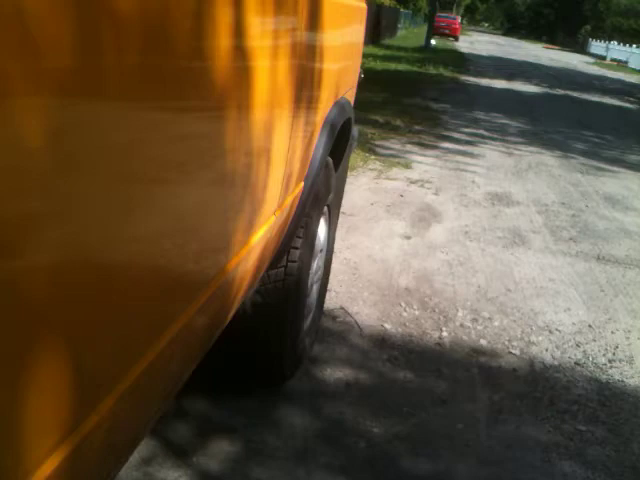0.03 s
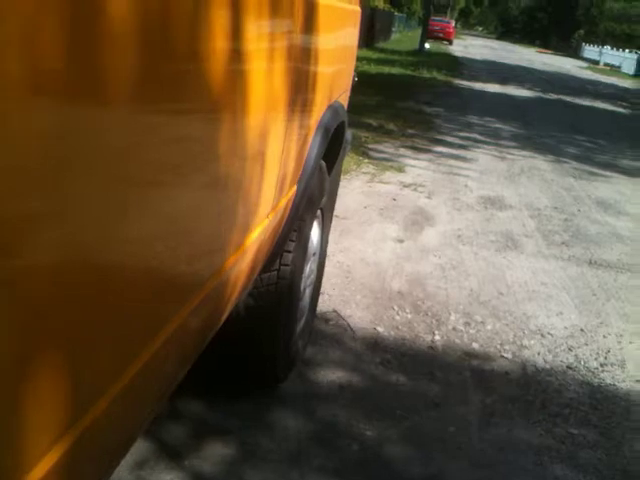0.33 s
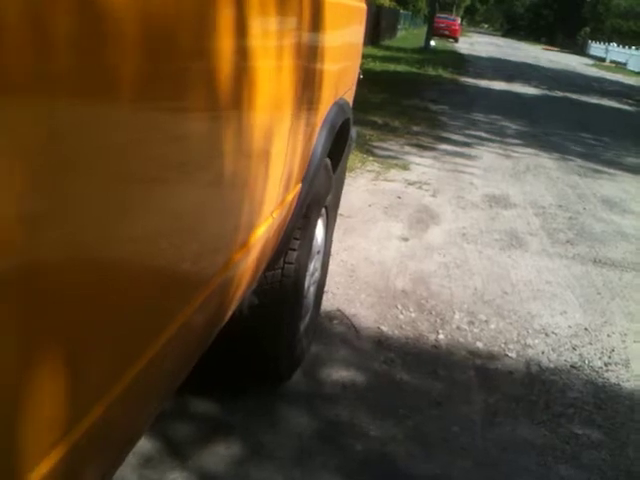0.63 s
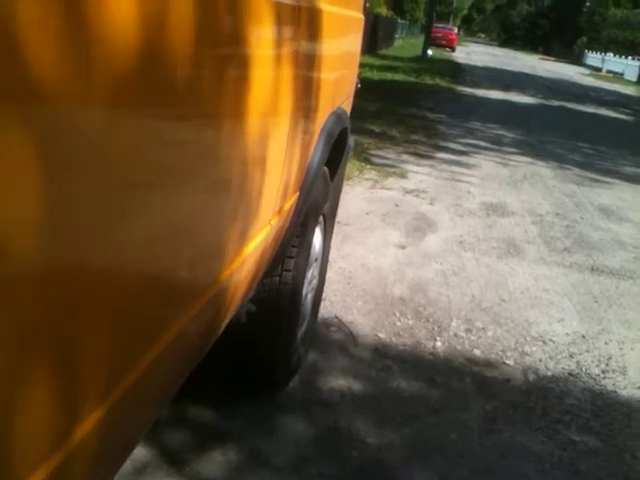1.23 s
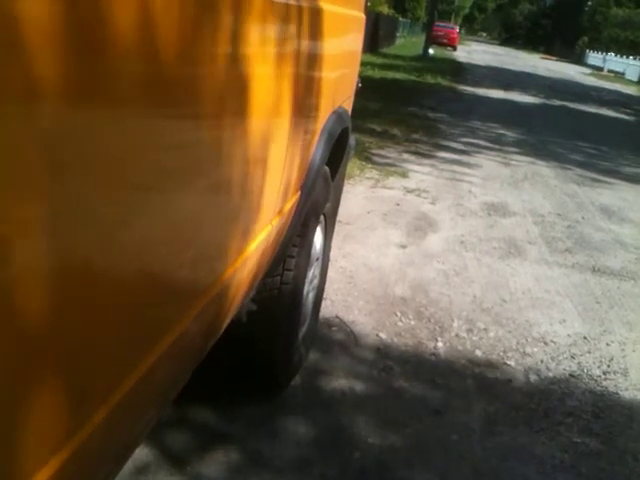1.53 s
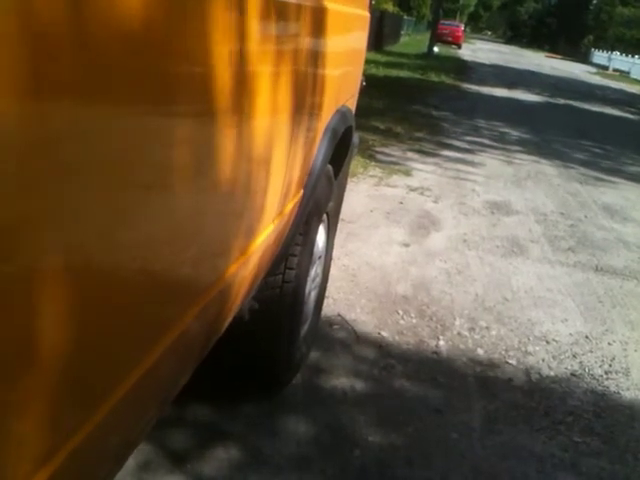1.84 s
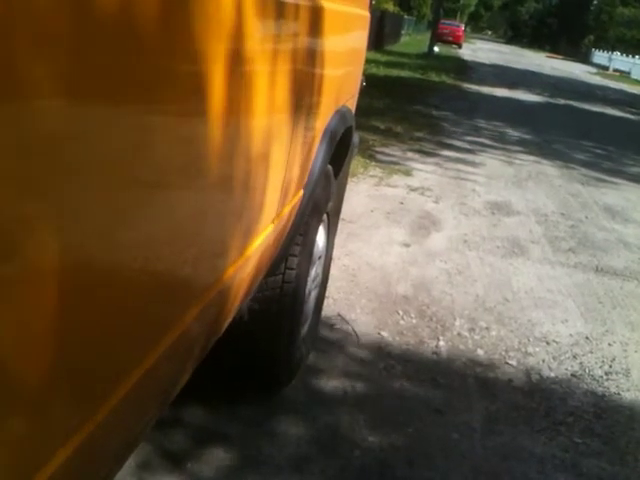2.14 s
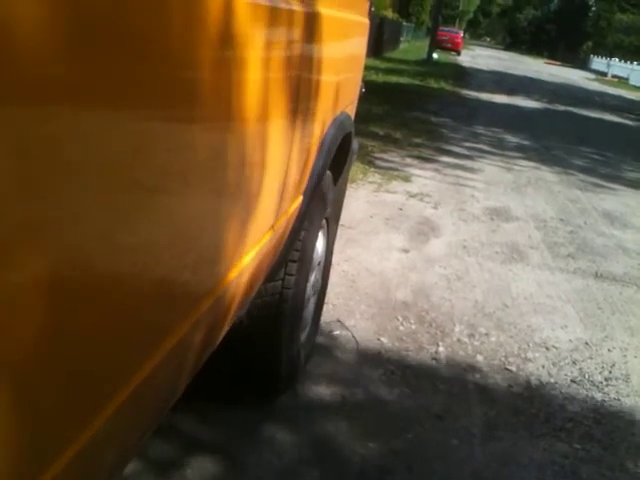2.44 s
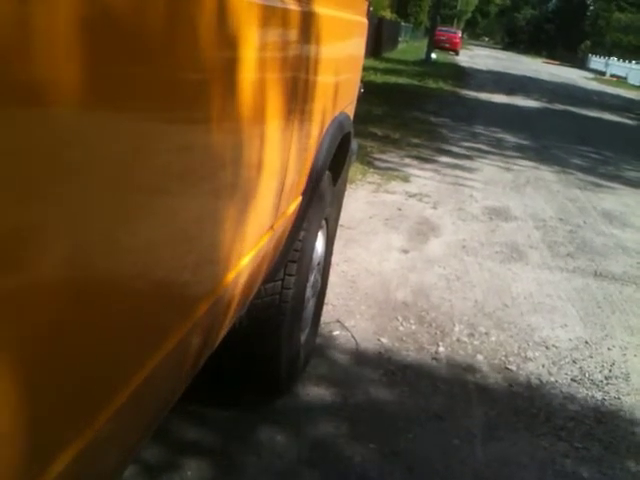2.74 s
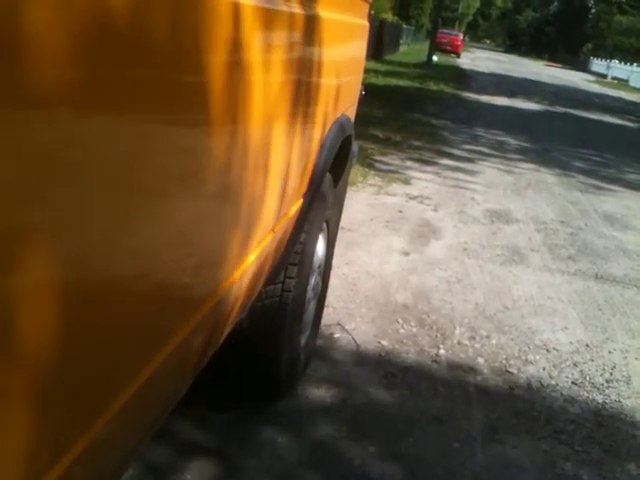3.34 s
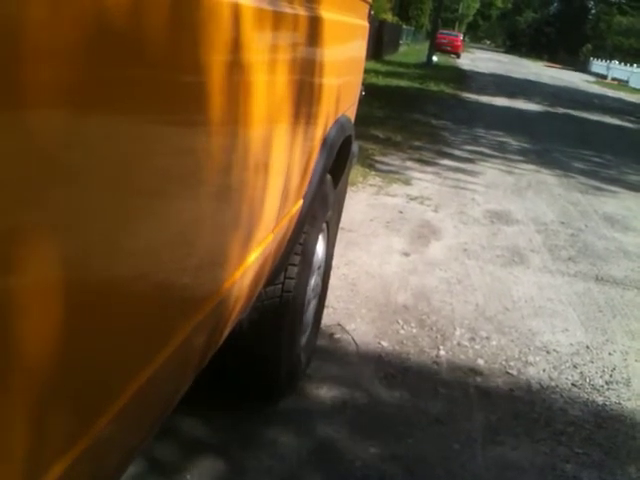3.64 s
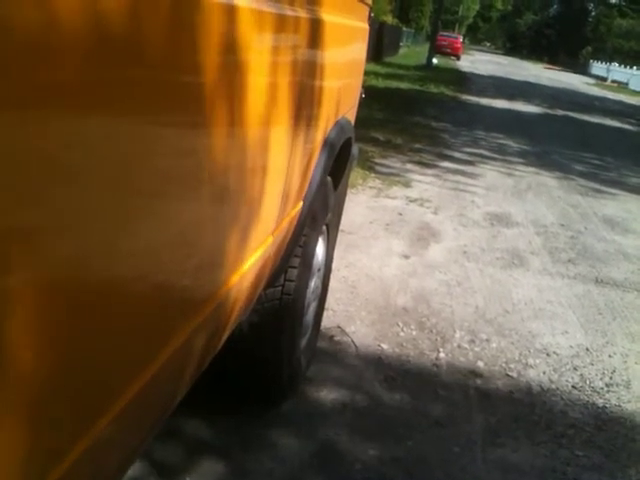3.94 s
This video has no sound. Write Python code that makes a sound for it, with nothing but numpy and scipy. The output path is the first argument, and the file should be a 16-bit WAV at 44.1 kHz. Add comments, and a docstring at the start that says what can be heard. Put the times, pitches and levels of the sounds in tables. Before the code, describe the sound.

A diesel truck engine cranks, starts and knocks into idle after faint key clicks.

```python
"""A cold diesel truck starts on a gravel road, heard from beside the cab.
First an outdoor hush, with key clicks, a small bird's chirps and two soft bumps.
At 2.65 s the starter slams in and whirrs; its gear clashes in surges as the first cylinders fire.
At 3.2 s the engine catches, flares and settles into a knocking idle: each firing knocks the block,
ticks an injector and puffs into the exhaust."""
import sys
import numpy as np
from scipy import signal
from scipy.fft import rfft, irfft
from scipy.io import wavfile

SR = 44100
rng = np.random.default_rng(int(sys.argv[2]) if len(sys.argv) > 2 else 0)


def wav_record(signal):
    """Record a signal, one row per channel, as 16-bit PCM in the file named by sys.argv[1]."""
    frames = np.transpose(np.atleast_2d(signal))
    bounded = np.clip(frames, -1, 1)
    # unit amplitude maps onto the largest positive 16-bit level
    quanta = np.round(bounded * 32767).astype(np.int16)
    wavfile.write(sys.argv[1], SR, quanta)


N = 176400
T = np.arange(N) / SR

# outdoor hush: freq_hz, gain_db
AIR_SPECTRUM = [(30,-42),(60,-26),(85,-21.5),(130,-6),(213,0),(389,-10.5),(700,-13.5),(1100,-13),(2100,-22),(4500,-28),(9000,-32.5),(15500,-44.5)]
# bird: start_s, length_s, start_hz, middle_hz, end_hz, level_db
CHIRPS = [(0.768,0.071,6000,6330,6200,-62.5), (1.167,0.058,4060,3680,3570,-62),
          (1.219,0.046,3950,4500,3720,-54.5), (1.223,0.034,4600,5330,4570,-61),
          (1.276,.16,5800,5900,6840,-62), (1.303,0.024,3280,3870,4520,-58.5),
          (1.774,0.0395,3700,4550,3840,-55.5), (1.785,0.029,4800,5300,4670,-61),
          (1.853,0.031,4430,3610,4600,-60), (2.559,0.027,3890,4570,4540,-51.5)]
# keys and switches: start_s, body_db, ring_db, tick_db
CLICKS = [(.253,-65,-62,-64), (.930,-52,-59,-51.5), (0.942,-53,-58,-61), (1.071,-51.5,-69,-55),
          (1.2592,-47.5,-65,-43), (1.268,-53,-62,-57), (1.5473,-53,-50,-42), (1.579,-72,-56,-64),
          (1.713,-76,-70,-55.5), (1.787,-76,-70,-61), (1.908,-68,-53.5,-63), (2.5256,-60,-51,-47),
          (2.585,-47,-46.5,-45.5)]
# body, ring and tick bands: low_hz, high_hz
CLICK_BANDS = [(900,2600), (4000,6060), (7500,10800)]
# cab bumps: start_s, level_db
BUMPS = [(1.08,-57),(2.47,-61)]

# pinion hits ring gear: start_s, crack_db, clunk_db
SLAMS = [(2.654,-33.5,-46), (2.6657,-25.5,-36.5), (2.681,-24,-24.5)]
# pinion impact: freq_hz, gain_db
CRACK_SPECTRUM = [(1000,-5),(1800,-3.5),(3000,-1.5),(4300,-0.5),(5600,4),(6800,-4.5),(8500,2.5),(10500,-6),(15000,-28)]
# starter housing: pitch_hz, waver_hz, gain_db
HOUSING_MODES = [(158,32,-2.5),(547.4,68.3,3),(810,75.6,6.5),(1047,61.3,7),(1477,80.4,-4),(1656,44.6,4.5)]
# starter under load: time_s, grind_db, groan_db, ring_gear_db
CRANKING = [(2.69,-68,-70,-44),(2.705,-41.5,-48,-42),(2.76,-43.5,-49,-57),(2.825,-46,-38.5,-53),(2.86,-58,-82,-58),(2.9,-42.5,-44,-41.5),(3.03,-49.5,-59,-49),(3.22,-66,-95,-80)]
# motor grind: centre_hz, width_hz, gain_db
GRIND_MODES = [(683,205,0.078),(1070,126,1),(1300,310,-0.079),(1680,104,-1)]
# motor hiss: freq_hz, gain_db
HISS_SPECTRUM = [(300, -3.5), (900, -1), (2000, -7.5), (5300, -1.5), (6500, -13), (9000, -9.5),
                 (13000, -34)]
# frame shaken by the starter: freq_hz, gain_db
FRAME_SPECTRUM = [(70,-20),(150,1.5),(260,-2),(900,-47)]
# motor groan: centre_hz, width_hz, gain_db
GROAN_MODES = [(776,100,-3),(1680,58,-7)]
# ring gear under the pinion: centre_hz, width_hz, gain_db
RING_GEAR_MODES = [(2540,66,3.5),(2890,84,0),(4200,66,2.5),(5250,140,-2)]
# gear clashes: start_s, hold_s, rattle_db, ring_db
SURGES = [(2.819,0.046,-41.5,-47.5),(2.88,0.015,-40,-67),(2.934,0.025,-33.5,-38),(2.999,0.031,-34,-38),(3.05,0.0065,-35,-34.5),(3.063,0.0093,-27.5,-50),(3.103,0.023,-29.5,-29.5),(3.138,0.0066,-28.5,-48),(3.17,0.021,-43.5,-59)]
# tooth rattle: freq_hz, gain_db
CLASH_SPECTRUM = [(120,-9),(220,-0.5),(800,-2),(3900,-4.5),(5400,-1),(6300,-8.5),(8600,-3),(10800,-11.5),(15000,-45)]
# tooth ring: centre_hz, width_hz, gain_db
TOOTH_MODES = [(5230,67,1.5),(8200,480,6),(8840,150,7.5)]

# engine speed: time_s, firing_hz
FIRING_RATE = [(3.177, 36.5), (3.25, 42.6), (3.4, 39.6), (3.53, 35.6), (3.7, 33.3), (3.87, 30.9),
               (4.0, 31.6)]
# running engine: time_s, knock_db, exhaust_db, whirr_db, tick_db
ENGINE_LEVELS = [(3.17,-35,-40.5,-39.5,-41.5),(3.26,-34.5,-39,-38,-40.5),(3.36,-37.5,-45,-41,-42),(3.65,-36,-46,-41.5,-42),(4.0,-38,-48.5,-43.5,-43.5)]
# cold cylinders firing with a bang: start_s, knock_db, tick_db
BANGS = [(2.946,-34.5,-49),(3.021,-33,-45),(3.117,-38,-30.5),(3.709,-37,-40),(3.802,-36,-45),(3.829,-35.5,-37.5),(3.866,-37,-57),(3.93,-39,-40),(3.959,-37,-35.5)]
# combustion knock: freq_hz, gain_db
KNOCK_SPECTRUM = [(200,-33),(400,-1),(560,-4.5),(1100,-6),(1600,-0.5),(2300,2.5),(3200,-6),(9000,-68)]
# engine block: centre_hz, width_hz, gain_db
BLOCK_MODES = [(728, 56, 1.6), (1061, 34, 2.7), (1435, 104, 6.2), (1657, 36, 6.3), (2210, 130, 2.8)]
# injector tick: freq_hz, gain_db
TICK_SPECTRUM = [(2000,-14),(3300,-3),(4300,2),(5400,4),(6500,-7),(8500,0),(10500,-10),(15500,-40)]
# exhaust note: firing_rate_multiple, gain_db
EXHAUST_HARMONICS = [(2,-30),(3,-9),(4,-3.5),(5,-5),(6,-5.5),(7,-7.5)]
# exhaust rumble: freq_hz, gain_db
RUMBLE_SPECTRUM = [(40,-36),(75,-20),(120,-3),(230,0),(320,-7),(410,-0.5),(1200,-49)]
# exhaust boom: freq_hz, gain_db
BOOM_SPECTRUM = [(45,-21),(62,-8),(75,13),(100,-1),(300,-46)]
# belts and gears: freq_hz, gain_db
WHIRR_SPECTRUM = [(200,-7),(550,-4.5),(1430,3.5),(2360,-4.5),(3400,-11.5),(8800,-12),(15000,-31.5)]

# envelopes: attack_s, hold_s, t60_s
CLICK_SHAPE_S, BUMP_SHAPE_S = (0.0014, 0.0012, 0.056), (0.019, 0.126, 0.62)
CRACK_SHAPE_S, CLUNK_SHAPE_S = (0.0014, 0.0037, 0.064), (0.004, 0.011, 0.074)
SQUEAL_SHAPE_S = (0.014, 0.0065, 0.081)
KNOCK_SHAPE_S, SLAP_SHAPE_S = (0.0043, 0.011, 0.091), (0.0016, 0.0012, 0.032)
TICK_SHAPE_S, BANG_SHAPE_S = (0.0044, 0.0076, 0.085), (0.004, 0.005, 0.06)


def from_db(db):
    """Decibels to gain."""
    return 10 ** (np.asarray(db) / 20)


def unit_rms(x):
    """Scale to rms 1."""
    return x / np.sqrt(np.mean(x ** 2) + 1e-20)


def gain_curves(rows):
    """One curve per dB column; silent before the first row."""
    time_s, *columns_db = np.transpose(rows)
    return [from_db(np.interp(T, time_s, db)) * (T >= time_s[0]) for db in columns_db]


def colour(x, spectrum):
    """Apply a spectrum, rolled off below its first point; rms 1."""
    freq_hz, gain_db = np.transpose(spectrum)
    bin_hz = np.maximum(np.fft.rfftfreq(N, 1 / SR), 1)
    gain = from_db(np.interp(np.log(bin_hz), np.log(freq_hz), gain_db))
    low_cut = 1 / np.sqrt(1 + (freq_hz[0] / bin_hz / 2) ** 4)
    return unit_rms(irfft(rfft(x) * gain * low_cut, N))


def bandpass(x, band_hz):
    """One band of x; rms 1."""
    return unit_rms(signal.sosfilt(signal.butter(2, band_hz, "band", fs=SR, output="sos"), x))


def noise(spectrum):
    """Coloured noise; rms 1."""
    return colour(rng.standard_normal(N), spectrum)


def drift(rate_hz):
    """Random wander below rate_hz; rms 1."""
    lowpass = signal.butter(2, rate_hz, fs=SR, output="sos")
    return unit_rms(signal.sosfilt(lowpass, rng.standard_normal(N)))


def grit(depth_db=1.5, grain_hz=620):
    """Metal on metal: noise in uneven grains."""
    return unit_rms(rng.standard_normal(N) * from_db(depth_db * drift(grain_hz)))


def ringing(modes):
    """Noise-driven resonances; rms 1."""
    return unit_rms(sum(
        from_db(db) * bandpass(rng.standard_normal(N), [hz - width_hz / 2, hz + width_hz / 2])
        for hz, width_hz, db in modes))


def wavering_tones(modes):
    """Steadily driven resonances: sines of wandering pitch; rms 1."""
    return unit_rms(sum(
        from_db(db) * np.sin(2 * np.pi * np.cumsum(hz + waver_hz * drift(rate_hz=148.7)) / SR)
        for hz, waver_hz, db in modes))


def blows(starts_s, levels_db, shape_s):
    """Attack-hold-decay envelopes, summed in power."""
    attack_s, hold_s, t60_s = shape_s
    age_s = T[:SR // 2]
    decay = from_db(-60 * np.maximum(age_s - attack_s - hold_s, 0) / t60_s)
    envelope = np.minimum(age_s / attack_s, 1) * decay
    power = np.zeros(N + SR)
    for start_s, level_db in zip(starts_s, levels_db):
        i = int(start_s * SR)
        power[i:i + len(age_s)] += (from_db(level_db) * envelope) ** 2
    return np.sqrt(power[:N])


def air(level_db=-56):
    """Steady outdoor hush."""
    return from_db(level_db) * noise(AIR_SPECTRUM)


def bird(waver_hz_per_s=3600, echo_db=-5.5, echo_t60_s=0.85):
    """Arched whistles, the longer the raspier, scattered by trees."""
    song, waver = np.zeros(N), drift(rate_hz=264)
    for start_s, length_s, *contour_hz, level_db in CHIRPS:
        span = (T >= start_s) & (T < start_s + length_s)
        progress = (T[span] - start_s) / length_s
        arch_hz = np.polyval(np.polyfit([0, 0.5, 1], contour_hz, 2), progress)
        pitch_hz = arch_hz + waver_hz_per_s * length_s * waver[span]
        envelope = from_db(level_db) * np.sqrt(np.abs(np.sin(np.pi * progress)))
        song[span] += envelope * np.sin(2 * np.pi * np.cumsum(pitch_hz) / SR)
    trees = rng.standard_normal(SR) * from_db(-60 * T[:SR] / echo_t60_s)
    echo = signal.fftconvolve(song, trees / np.linalg.norm(trees))[:N]
    return song + from_db(echo_db) * echo


def keys():
    """Small clicks, each its own mix of three ringing bands."""
    start_s, *columns_db = np.transpose(CLICKS)
    return sum(blows(start_s, db, CLICK_SHAPE_S) * bandpass(grit(), band_hz)
               for db, band_hz in zip(columns_db, CLICK_BANDS))


def bumps():
    """Soft low bumps in the cab."""
    return blows(*np.transpose(BUMPS), BUMP_SHAPE_S) * bandpass(rng.standard_normal(N), band_hz=(83, 193))


def pinion_slam():
    """The solenoid throws the pinion in: three cracks, the last ringing the housing hardest."""
    start_s, crack_db, clunk_db = np.transpose(SLAMS)
    cracks = blows(start_s, crack_db, CRACK_SHAPE_S) * colour(grit(), CRACK_SPECTRUM)
    clunks = blows(start_s, clunk_db, CLUNK_SHAPE_S) * wavering_tones(HOUSING_MODES)
    return cracks + clunks


def starter_motor(hiss_db=-2, frame_db=-1.5):
    """The loaded motor grinds, shakes the frame, groans and rings the ring gear."""
    grind_gain, groan_gain, ring_gain = gain_curves(CRANKING)
    grind = ringing(GRIND_MODES) + from_db(hiss_db) * colour(grit(), HISS_SPECTRUM)
    shake = from_db(frame_db) * noise(FRAME_SPECTRUM)
    tones = groan_gain * ringing(GROAN_MODES) + ring_gain * ringing(RING_GEAR_MODES)
    return grind_gain * (grind + shake) + tones


def drive_squeal(start_s=2.887, level_db=-35, pitch_hz=1300, waver_hz=70):
    """One brief squeal of the starter drive."""
    return blows([start_s], [level_db], SQUEAL_SHAPE_S) * wavering_tones([(pitch_hz, waver_hz, 0)])


def gear_clash(attack_s=0.0088, t60_s=0.14):
    """First firings kick the flywheel; the teeth rattle and ring in surges."""
    rattle_power, ring_power = np.zeros((2, N))
    for start_s, hold_s, rattle_db, ring_db in SURGES:
        shape_s = (attack_s, hold_s, t60_s)
        rattle_power += blows([start_s], [rattle_db], shape_s) ** 2
        ring_power += blows([start_s], [ring_db], shape_s) ** 2
    rattle = np.sqrt(rattle_power) * colour(grit(), CLASH_SPECTRUM)
    return rattle + np.sqrt(ring_power) * ringing(TOOTH_MODES)


def block_knock(firings_s, spread_db, gain, modes_db=-3, slap_db=-7.5, slap_spread_db=3, lag_s=0.007):
    """Firings, lagging piston slaps and cold bangs ring the block."""
    block = colour(grit(), KNOCK_SPECTRUM) + from_db(modes_db) * ringing(BLOCK_MODES)
    knocks = blows(firings_s, spread_db, KNOCK_SHAPE_S)
    slaps = blows(firings_s + lag_s, rng.normal(slap_db, slap_spread_db, len(firings_s)), SLAP_SHAPE_S)
    bang_s, bang_db, _ = np.transpose(BANGS)
    bangs = blows(bang_s, bang_db, BANG_SHAPE_S)
    return np.hypot(gain * np.hypot(knocks, slaps), bangs) * unit_rms(block)


def injectors(firings_s, spread_db, gain):
    """A bright tick per firing and per cold bang."""
    ticks = gain * blows(firings_s, spread_db, TICK_SHAPE_S)
    bang_s, _, bang_db = np.transpose(BANGS)
    return np.hypot(ticks, blows(bang_s, bang_db, BANG_SHAPE_S)) * colour(grit(), TICK_SPECTRUM)


def exhaust(cycles, gain, pipe_lag_cycles=0.85, waver_db=3, note_db=-2.5, rumble_db=-3):
    """Puffs, delayed by the pipe, make a low note over rumble; a boom grows as the gain cubed."""
    phase_rad = 2 * np.pi * (cycles - pipe_lag_cycles)
    harmonics = sum(from_db(db + waver_db * drift(rate_hz=7.3)) * np.cos(multiple * phase_rad)
                    for multiple, db in EXHAUST_HARMONICS)
    note = from_db(note_db) * np.minimum(cycles, 1) * harmonics
    rumble = from_db(rumble_db) * noise(RUMBLE_SPECTRUM)
    boom = from_db(67.5) * gain ** 3 * noise(BOOM_SPECTRUM)
    return gain * (note + rumble) + boom


def engine(spread_db=1):
    """The firing rate times knock, injectors and exhaust; belts and gears whirr."""
    time_s, firing_hz = np.transpose(FIRING_RATE)
    cycles = np.cumsum(np.interp(T, time_s, firing_hz) * (T >= time_s[0])) / SR
    firings_s = T[np.flatnonzero(np.diff(np.ceil(cycles)))]  # one per cycle
    knock_spread_db, tick_spread_db = rng.normal(0, spread_db, (len(firings_s), 2)).T
    knock_gain, exhaust_gain, whirr_gain, tick_gain = gain_curves(ENGINE_LEVELS)
    return (block_knock(firings_s, knock_spread_db, knock_gain)
            + injectors(firings_s, tick_spread_db, tick_gain)
            + exhaust(cycles, exhaust_gain)
            + whirr_gain * noise(WHIRR_SPECTRUM))


def scene():
    """Background, starter and engine; mono."""
    background = air() + bird() + keys() + bumps()
    starter = pinion_slam() + starter_motor() + drive_squeal() + gear_clash()
    return (background + starter + engine())[None]


def record(dry):
    """Brief opening silence; steep treble cut."""
    open_s, fade_s, stopband_hz = 0.1186, 0.003, 16500
    fade_in = np.clip((T - open_s) / fade_s, 0, 1)
    lowpass = signal.cheby2(14, 70, stopband_hz, fs=SR, output="sos")
    return signal.sosfilt(lowpass, dry * fade_in)


dry = scene()
out = record(dry)
wav_record(out)
```